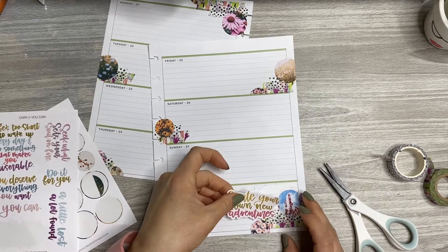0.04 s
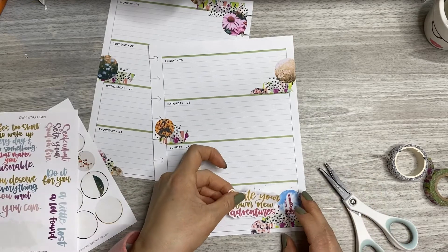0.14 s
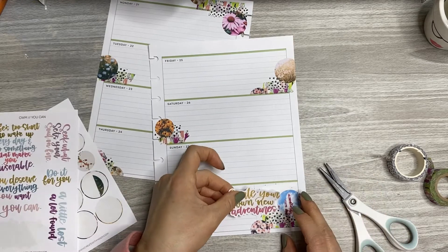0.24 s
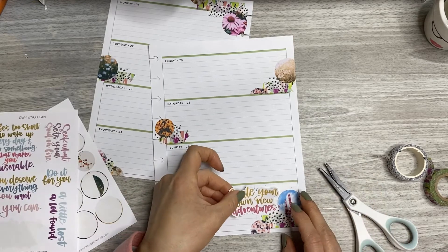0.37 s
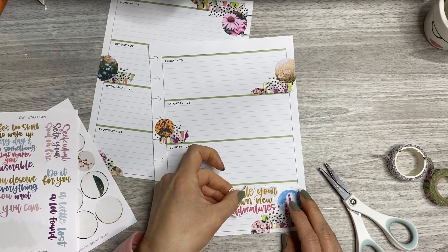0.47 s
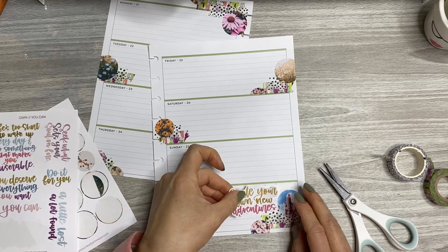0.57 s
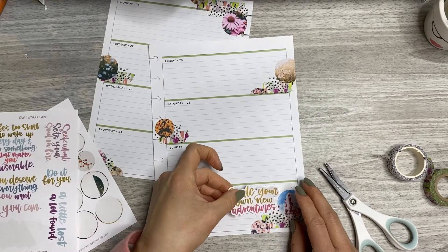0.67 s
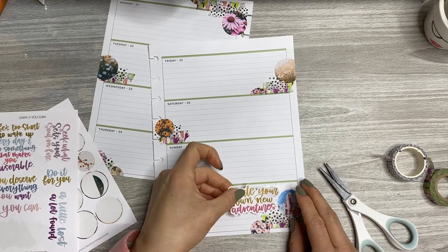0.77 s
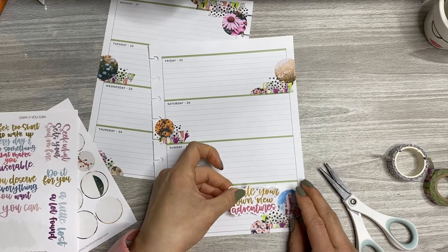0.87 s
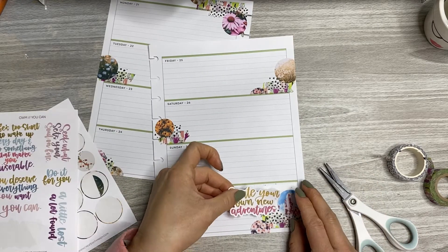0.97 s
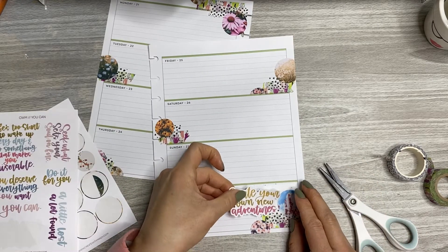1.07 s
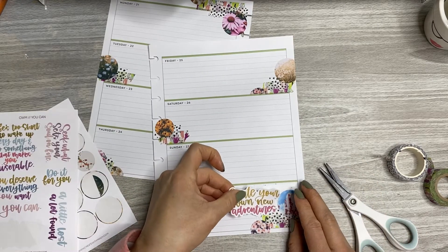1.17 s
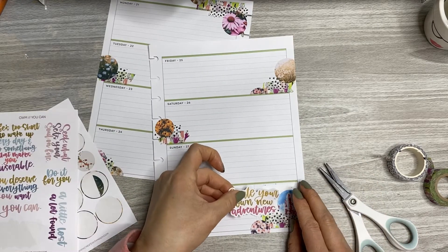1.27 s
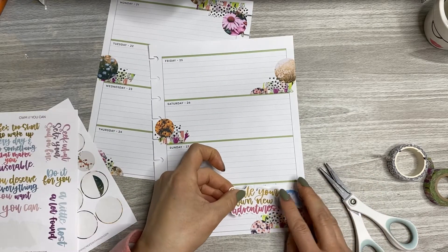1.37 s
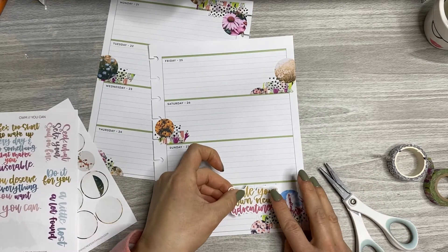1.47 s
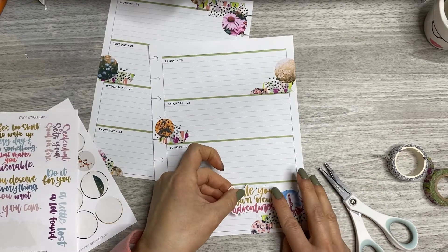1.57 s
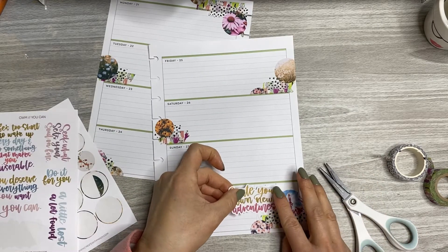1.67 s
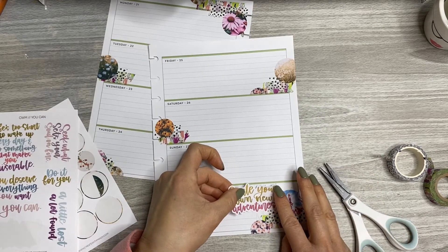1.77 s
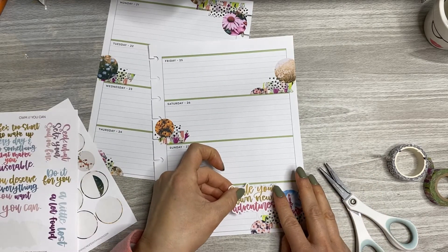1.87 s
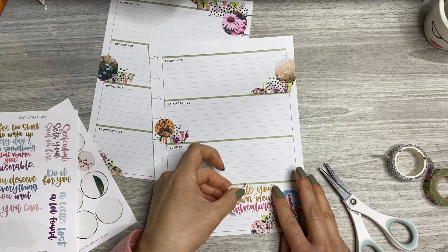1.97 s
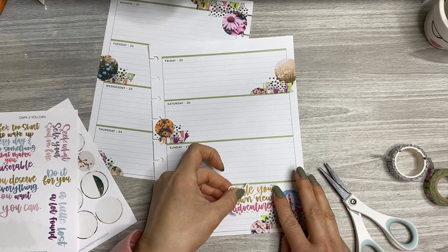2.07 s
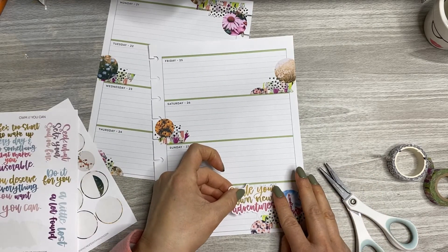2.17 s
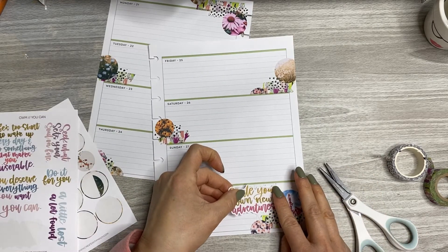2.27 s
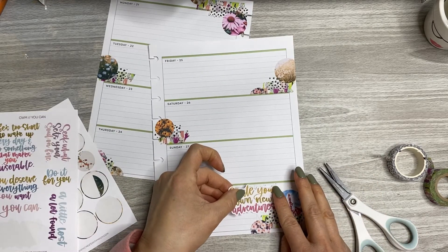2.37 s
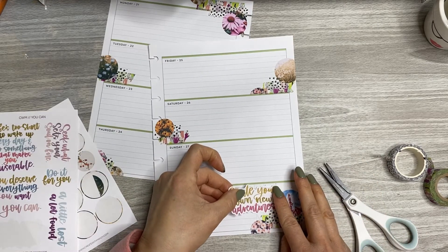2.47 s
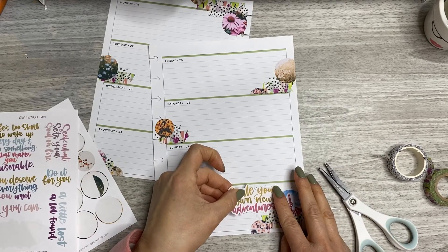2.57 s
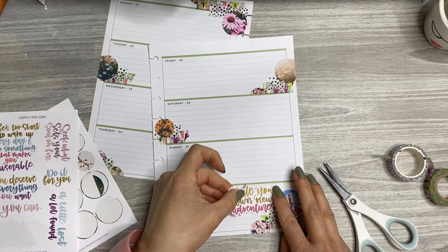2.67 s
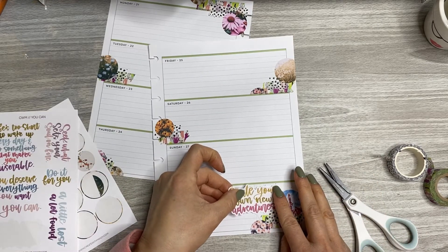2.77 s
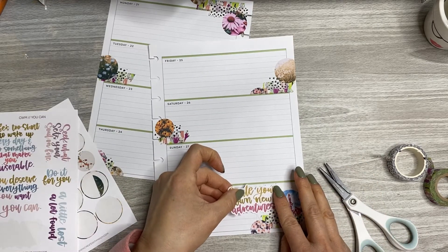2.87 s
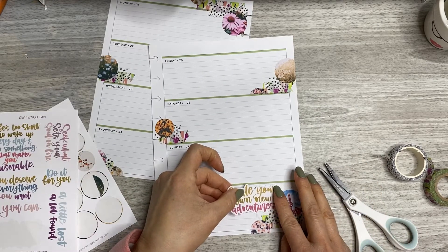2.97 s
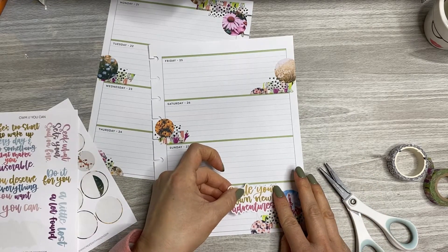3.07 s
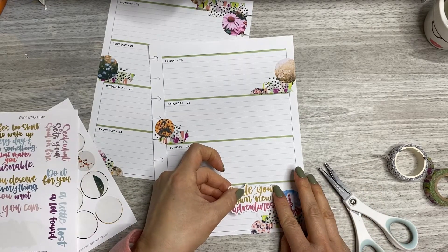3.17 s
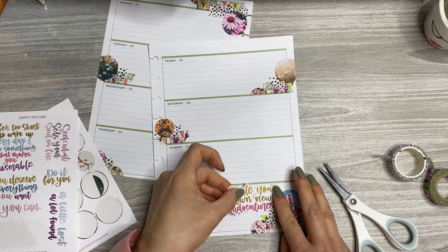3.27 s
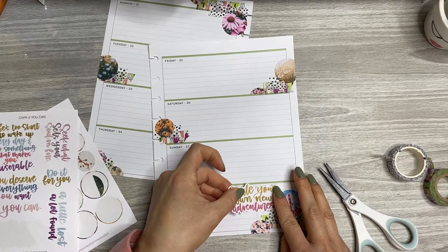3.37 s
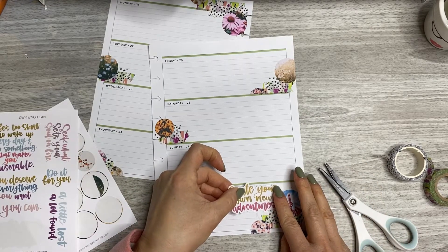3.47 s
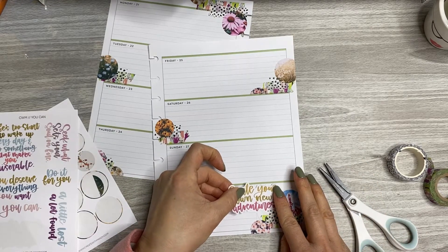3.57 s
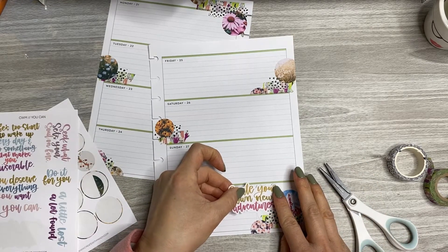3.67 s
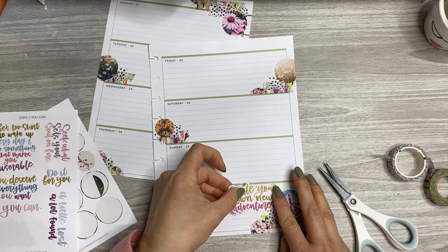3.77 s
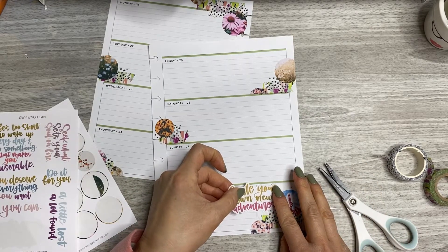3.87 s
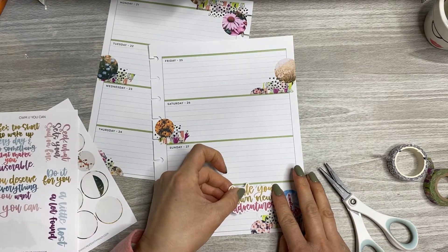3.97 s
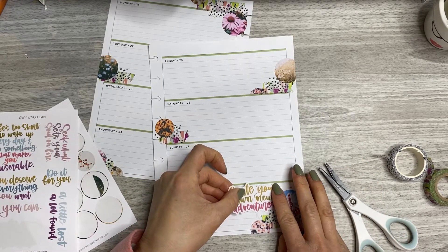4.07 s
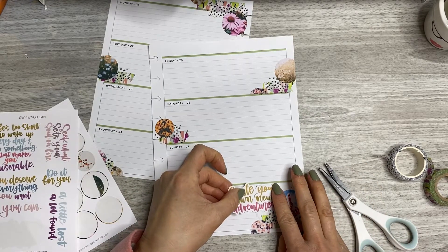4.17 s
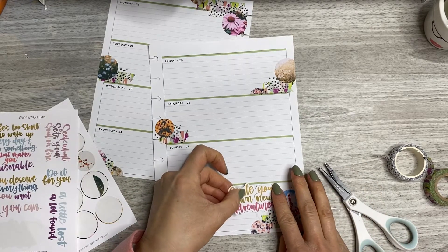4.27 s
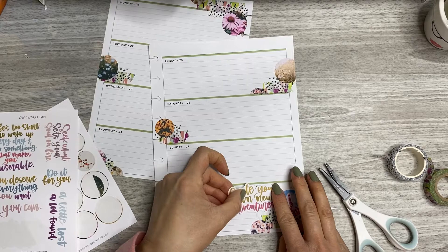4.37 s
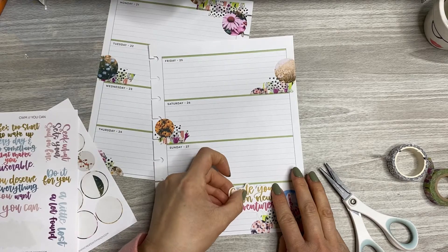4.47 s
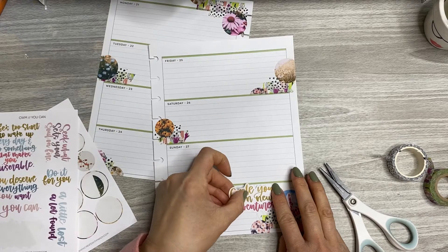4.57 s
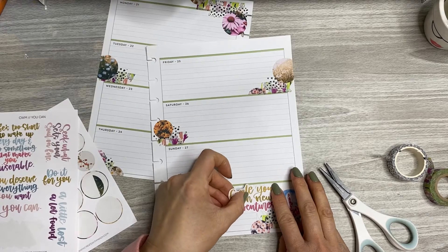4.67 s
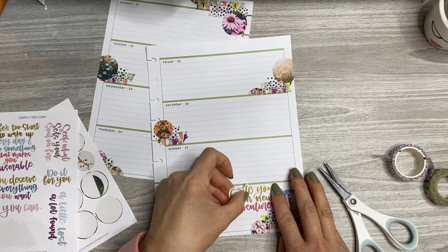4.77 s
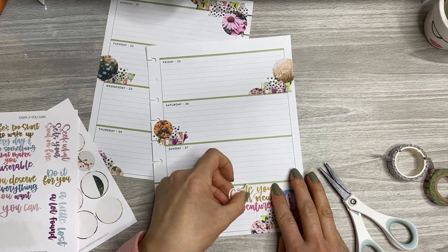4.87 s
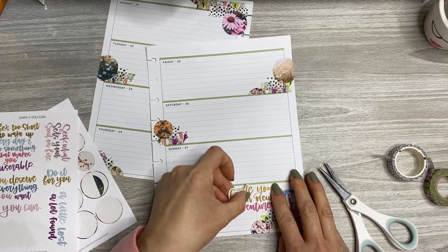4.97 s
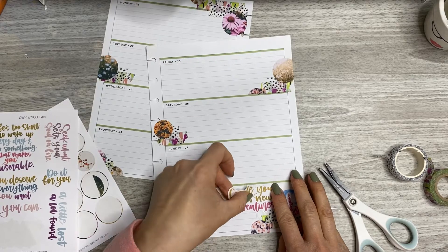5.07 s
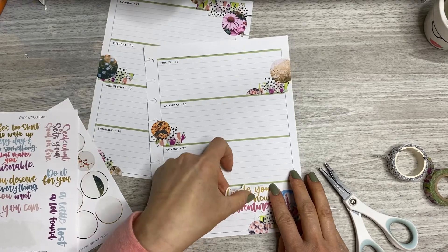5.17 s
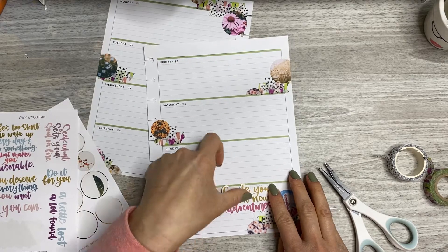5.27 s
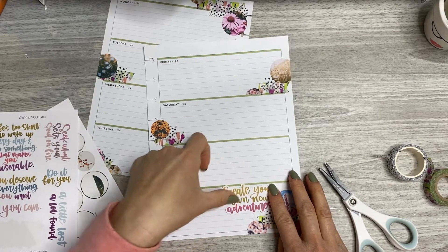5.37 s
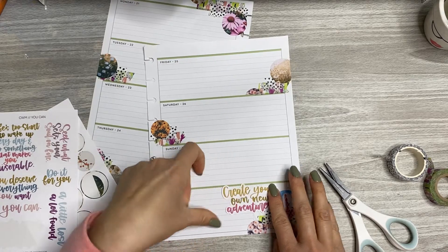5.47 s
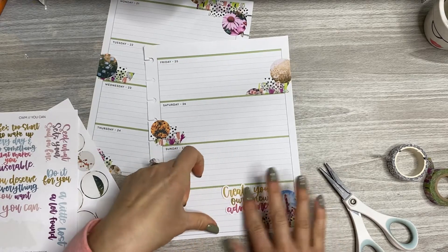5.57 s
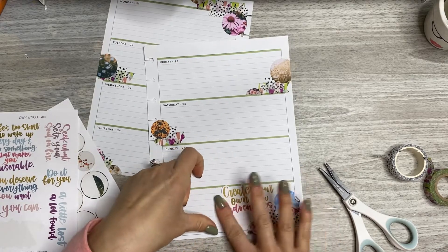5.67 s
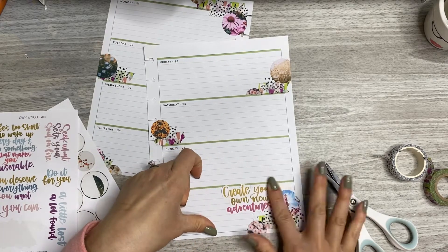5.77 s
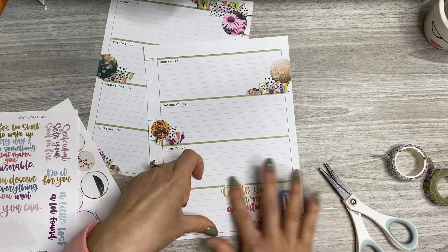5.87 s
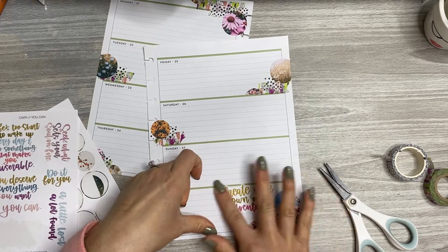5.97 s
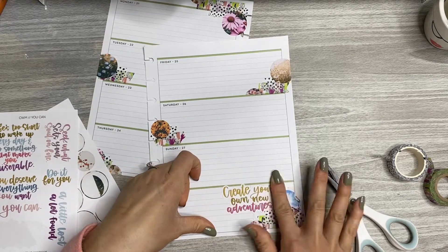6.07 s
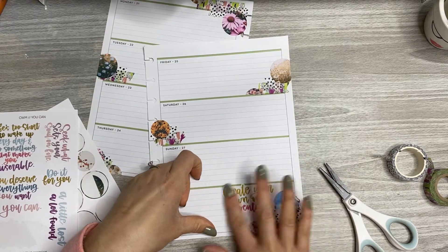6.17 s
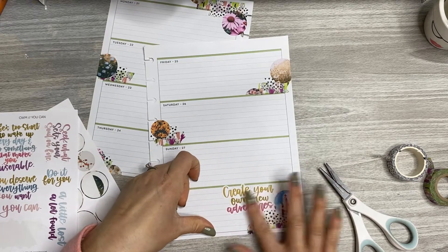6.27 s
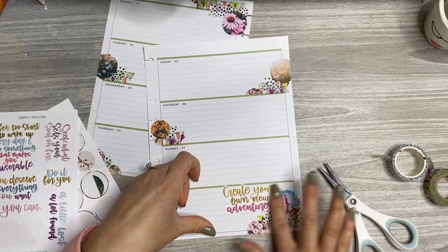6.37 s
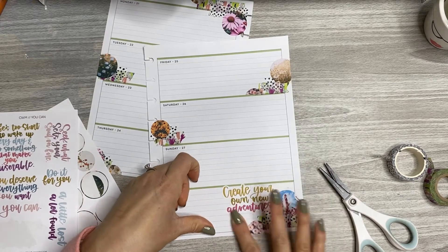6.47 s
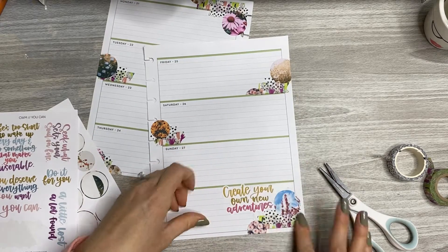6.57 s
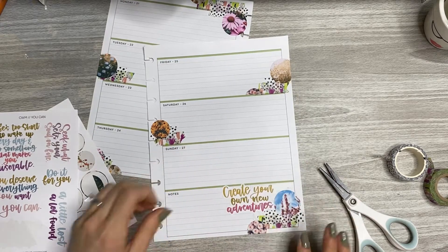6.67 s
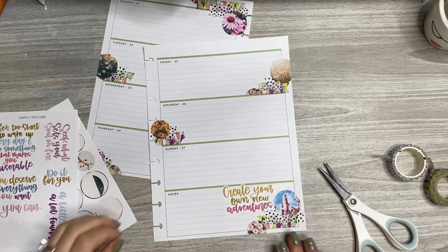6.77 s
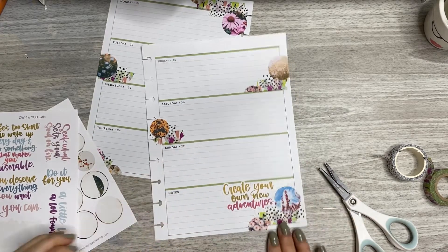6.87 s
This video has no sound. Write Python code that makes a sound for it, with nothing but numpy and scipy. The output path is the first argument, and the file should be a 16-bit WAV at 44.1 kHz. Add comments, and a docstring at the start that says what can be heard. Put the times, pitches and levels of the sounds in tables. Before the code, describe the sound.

A small room hums low, pulsing about three times a second. Fingertips barely slide and tick on a glossy paper sticker for several seconds. After a clear click and a thin drag, the sticker snaps free with a loud, bright crackle. Eight quick rubs then hiss to and fro, with two solid finger bumps on the table, and a palm sweeps away. Close stereo microphones.

```python
"""Hands lay a paper sticker on a planner page on a table: fingertips shift and tick on the sheet, the sticker
snaps free of the thumb, then eight quick strokes smooth it down and the hands sweep off the page.
Shaped noise makes the rubbing, spread-out clicks the ticks, fading tones the ringing sticker and table.
Fingers bump the table four times, twice hard. Two motors beat against each other in a small room's low hum."""
import sys
import numpy as np
from scipy import signal
from scipy.fft import rfft, irfft, next_fast_len
from scipy.io import wavfile
from scipy.ndimage import uniform_filter1d, map_coordinates

SR = 44100
rng = np.random.default_rng(int(sys.argv[2]) if len(sys.argv) > 2 else 0)


def generate_wav(signal):
    """Clip the signal to [-1, 1] and save it as 16-bit WAV at the path in sys.argv[1]."""
    frames = np.transpose(np.atleast_2d(signal))
    scaled = np.clip(frames, -1, 1) * 32767
    pcm = np.round(scaled).astype(np.int16)
    wavfile.write(sys.argv[1], SR, pcm)


N = 305833

# Strokes that smooth the sticker down. Each row: start in seconds, end in seconds,
# skin hiss in dB and page rustle in dB, both before the trims in smoothing().
STROKES = [(5.518, 5.626, -53.5, -74), (5.685, 5.768, -50, -64), (5.816, 5.9, -48.8, -62),
           (5.96, 6.048, -50, -63.5), (6.11, 6.18, -46.5, -62.5), (6.226, 6.316, -49.5, -63),
           (6.364, 6.436, -51, -64), (6.474, 6.556, -52, -64)]
# Short slides of a fingertip over the page. Each row: start in seconds, end in seconds, level in dB,
# tilt in dB per octave, level of the catches in dB relative to the slide.
SLIDES = [(.29, .39, -85, 0, 2), (.51, .72, -76.5, -1, -8), (.612, .672, -69, -2, 1),
          (1.34, 1.46, -77.5, -3, -8), (1.67, 1.9, -82.5, 0, 4), (1.725, 1.785, -71.5, 1, 7),
          (2.18, 2.25, -78, 0, 2), (2.85, 2.9, -77, 1, -2), (3.325, 3.355, -82, 0, 3),
          (3.9, 3.965, -80.5, -3, -5), (4.362, 4.42, -73, -2, -5), (5.44, 5.52, -66, 2, -3)]
# The sticker snapping off the thumb: time in seconds, level in dB, swell time in seconds,
# time for the crackle to fall 60 dB in seconds.
SNAP = (5.209, -22.7, .0013, .01)
# Colour of the rustling page. Each row: frequency in Hz, relative level in dB per Hz.
PAGE = [(120, -4), (300, 4), (650, .5), (1000, 1), (1350, -1.5), (1900, 1), (2800, -6), (4500, -18),
        (9000, -40)]
TOP_HZ = 15850  # band limit


def amp(db):
    """Decibels to gain."""
    return 10 ** (np.asarray(db) / 20)


def unit(x):
    """x scaled to an rms of 1."""
    return x / np.sqrt(np.mean(x ** 2) + 1e-20)


def along(points, hz):
    """Read a curve of (Hz, value) points on a logarithmic frequency axis."""
    f, v = np.transpose(points)
    return np.interp(np.log(hz + 1), np.log(f + 1), v)


def level(t, rows, column):
    """Gain at the times t along a curve given in dB."""
    rows = np.asarray(rows)
    return amp(np.interp(t, rows[:, 0], rows[:, column]))


def clock():
    """The time of every sample in seconds."""
    return np.arange(N) / SR


def filtered(x, response):
    """Multiply the spectrum of x by a response that depends on frequency."""
    n = x.shape[-1]
    m = next_fast_len(n + SR // 8)  # spare room so that the end does not wrap round
    return irfft(rfft(x, m) * response(np.fft.rfftfreq(m, 1 / SR)), m)[..., :n]


def coloured(x, spectrum):
    """x shaped by a curve of (Hz, dB), at an rms of 1."""
    return unit(filtered(x, lambda hz: amp(along(spectrum, hz))))


def add(track, s, sound):
    """Mix a sound into the track from time s."""
    part = track[max(round(s * SR), 0):][:len(sound)]
    part += sound[:len(part)]


def fading_modes(t, modes, after):
    """A struck object rings at its own pitches, each dying at its own pace from time zero of after."""
    return sum(amp(db - 60 * after / t60) * np.sin(2 * np.pi * (hz * t + rng.random()))
               for hz, db, t60 in modes)


def fibres(size, spiky_db):
    """Friction: countless tiny slips over paper fibres, a few much larger than the rest."""
    catch = np.repeat(rng.standard_normal(size // 16 + 1), 16)[:size]
    return rng.standard_normal(size) * amp(spiky_db * catch)


def halting(size, depth_db=1.5, rate=110):
    """The uneven grip of skin on paper: a random gain drawn rate times a second and smoothly joined."""
    draws = rng.standard_normal(int(size * rate / SR) + 4)
    return amp(depth_db * map_coordinates(draws, [np.arange(size) * rate / SR]))


def contact(t, start, end, rise, fall):
    """Speed of a finger that sets off around start and comes to rest around end."""
    setting_off = 1 + np.tanh((t - start) / rise)
    stopping = 1 + np.tanh((end - t) / fall)
    return setting_off * stopping / 4


def patchy(x, depth_db):
    """The colour of a rub drifts as the fingers cross different parts of the page."""
    z = signal.stft(x, nperseg=512)[2]
    field = uniform_filter1d(rng.standard_normal(z.shape), size=5, axis=0)  # smooth over frequency
    field = uniform_filter1d(field, size=8, axis=1)  # smooth over time
    return unit(signal.istft(z * amp(depth_db * unit(field)), nperseg=512)[1][:len(x)])


def resonant(x):
    """x with the resonances of the room and desk standing out of it, at an rms of 1."""
    # Each row: centre in Hz, width in Hz, boost in dB.
    resonances = [(293, 25, 4), (445, 35, 4), (587, 30, 4), (860, 45, 3), (1253, 70, 3), (1850, 120, 2)]

    def boost(hz):
        return amp(sum(db / (1 + (2 * (hz - centre) / width) ** 2) for centre, width, db in resonances))
    return unit(filtered(x, boost))


def spread(pair):
    """Two unrelated signals become a diffuse field at the left and right microphones."""
    # How alike left and right are. Each row: frequency in Hz, likeness from 0 to 1.
    likeness = [(120, .99), (300, .9), (550, .2), (1100, .15), (1700, .8), (2700, .3), (5000, .55),
                (7500, .85), (13000, .7)]

    def mid_and_side(hz):
        turn = np.arccos(np.clip(along(likeness, hz), -1, 1)) / 2
        return np.array([np.cos(turn), np.sin(turn)])
    mid, side = filtered(pair, mid_and_side)
    return np.array([mid + side, mid - side])


def room_tone(rumble_db=-51.6, air_db=-64, in_step=.12):
    """Two motors just out of tune throb three times a second over mains hum, steady rumble and air."""
    # Motors and mains. Each row: frequency in Hz, level in dB rms.
    hum_tones = [(53.75, -51.7), (56.98, -50), (120, -62)]
    # Colour of the room's rumble. Each row: frequency in Hz, relative level in dB per Hz.
    rumble_colour = [(20, -27), (35, -20), (46, -9), (57, -1.5), (68, -6), (88, -10), (105, -2), (121, -5),
                     (131, 3), (146, -9), (180, -11), (240, -24), (400, -46), (700, -90)]
    # Colour of the room's air noise. Each row: frequency in Hz, relative level in dB per Hz.
    air_colour = [(100, -14), (250, -1.5), (350, -2.5), (450, -3.5), (640, -6.5), (820, -16.5), (1100, -24),
                  (1400, -22), (1800, -24.5), (2200, -33), (4000, -37), (8000, -41), (13000, -44.5),
                  (15000, -54)]
    t = clock() - in_step  # the motors swing together at in_step seconds
    hum = sum(amp(db) * unit(np.cos(2 * np.pi * hz * t)) for hz, db in hum_tones)
    rumble = amp(rumble_db) * coloured(rng.standard_normal((2, N)), rumble_colour)
    air = amp(air_db) * resonant(coloured(rng.standard_normal((2, N)), air_colour))
    return hum + spread(rumble + air)


def tick(body_db, edge_db, gain_db=26.3, travel=.0009, flutter_db=-2, flutter_t60=.012):
    """A crack that bending waves smear over a millisecond or more, then a short flutter of the paper."""
    t = np.arange(SR // 16) / SR
    colour = [(900, body_db - 16), (2200, body_db + 1), (3500, body_db / 2 - 2), (5300, 3),
              (7500, edge_db / 2 - 3), (11000, edge_db - 3), (16000, edge_db - 9)]  # (Hz, dB)
    flutter = rng.standard_normal(len(t)) * amp(-60 * t / flutter_t60)
    burst = (t == 0) + amp(flutter_db) * flutter / np.linalg.norm(flutter)

    def through_sheet(hz):
        lag = 2 * np.pi * travel * 2 * np.sqrt(hz * TOP_HZ)  # high notes run faster through the sheet
        return amp(along(colour, hz)) * np.exp(-1j * lag)
    return amp(gain_db) * filtered(burst, through_sheet)


def catches(scatter_db=3.5, per_s=45, scratch_db=-9, strays_per_s=3, stray_db=-83):
    """Chance ticks: fingers catch often in a slide or stroke; the held sticker's glue ticks now and then."""
    t = clock()
    chance = rng.random(N)
    size = amp(scatter_db * np.clip(rng.standard_normal(N), -2, 1))
    sliding = sum(amp(db + catch_db) * (t > start) * (t < end) for start, end, db, _, catch_db in SLIDES)
    # nails catch on the page during a stroke, scratch_db relative to the stroke's hiss
    rubbing = sum(amp(db + scratch_db) * (t > start) * (t < end) for start, end, db, _ in STROKES)
    held = amp(stray_db) * (t < SNAP[0])
    caught = (sliding + rubbing) * (chance < per_s / SR)
    stray = held * (chance < strays_per_s / SR)
    return signal.fftconvolve(size * (caught + stray), tick(body_db=-17, edge_db=-1))[:N]


def glide(size, tilt_db, spiky_db=4):
    """Light, halting friction of skin on the glossy sticker, duller or brighter by its tilt."""
    # Colour of the friction. Each row: frequency in Hz, relative level in dB per Hz before the tilt.
    glossy = [(500, -15), (1500, -16), (3000, -16), (4000, -10.5), (4700, -8), (5300, 2.5), (6100, -.5),
              (7200, -2), (9000, -6), (12500, -7), (15800, -16)]
    colour = [(hz, db + tilt_db * np.log2(max(hz, 3000))) for hz, db in glossy]  # tilts above 3 kHz
    return coloured(fibres(size, spiky_db), colour) * halting(size)


def slides(ease=.22, longest_ease=.03):
    """Short slides while the sticker is lined up; longer ones ease in and out more slowly."""
    out = np.zeros(N)
    margin = .12  # seconds of lead-in
    for start, end, db, tilt_db, _ in SLIDES:
        t = start - margin + np.arange(SR // 2) / SR
        edge = min(ease * (end - start) + .004, longest_ease)
        add(out, t[0], amp(db) * glide(len(t), tilt_db) * contact(t, start, end, edge, edge))
    return out


def ticks(lead=.0009):
    """The sharpest ticks of nail, glue and paper edge, each with its own colour."""
    # Each row: time in seconds, level in dB before the gain in tick(), body in dB, edge in dB.
    sharp_ticks = [(0.6342, -56, -10, -3), (0.6582, -64, -10, 7), (1.7494, -65, -20, -1),
                   (1.7653, -62, -24, -3), (2.8471, -65, -14, 1), (4.5769, -60, -22, -7),
                   (4.588, -37.5, -12, -7), (4.692, -61, -8, 0), (4.7614, -72, -20, -1),
                   (4.9532, -71, -13, 8), (5.1148, -55, -17, 4), (5.45, -58, -16, 1),
                   (5.4694, -52, -16, 12), (5.8112, -58, -3, 0)]
    out = np.zeros(N)
    for s, db, body_db, edge_db in sharp_ticks:
        add(out, s - lead, amp(db) * tick(body_db, edge_db))
    return out


def bumps(fall=.0125, arrival=.0095, width=.0048, slap_t60=.026, rustle_db=-15, rustle_t60=.13):
    """A finger slaps the paper, which rustles on; a bending wave, high notes first, makes the table ring."""
    # Fingers on the table. Each row: time in seconds, thud level in dB, first pitch in Hz,
    # slap level in dB before a 4 dB lift, slap rise in seconds, slap tilt in dB per octave.
    hits = [(2.3342, -50, 340, -55.5, .0005, 1.2), (5.8655, -33.5, 280, -36, .004, -.9),
            (5.932, -54, 280, -51, .003, -2.5), (6.385, -32, 270, -42, .003, -4.3)]
    # Colour of the slap. Each row: frequency in Hz, relative level in dB per Hz before the tilt.
    slap_colour = [(100, -1), (250, 3), (450, 4), (1000, 1), (2000, -4), (4500, -7), (7000, -12),
                   (15000, -18)]
    # Ringing of the table top. Each row: pitch in Hz, level in dB relative to the thud,
    # time to fall 60 dB in seconds.
    table_modes = [(178, -17, .14), (325, -12, .1), (368, -12, .11), (490, -18, .08)]
    out, t = np.zeros(N), np.arange(SR // 6) / SR
    for s, thud_db, first_hz, slap_db, rise, tilt_db in hits:
        pitch = first_hz / (1 + (t / fall) ** 3)
        swell = np.exp(-((t - arrival) / width) ** 2 / 2)
        thud = swell * np.sin(2 * np.pi * np.cumsum(pitch) / SR)
        ring = fading_modes(t, table_modes, after=t) * (1 - np.exp(-t / arrival))
        fade = amp(-60 * t / slap_t60) + amp(rustle_db - 60 * t / rustle_t60)
        colour = [(hz, db + tilt_db * np.log2(hz)) for hz, db in slap_colour]
        slap = coloured(rng.standard_normal(len(t)), colour) * (1 - np.exp(-t / rise)) * fade
        add(out, s, amp(thud_db) * (thud + ring) + amp(slap_db + 4) * slap)
    return out


def peeling(drag_db=1, settle_db=-21, settle_t60=.7):
    """The sticker slips once and settles; then the thumb drags off it, before and after the snap."""
    # The sticker shifting under the thumb: time of the fastest slip in seconds, level in dB,
    # swell time in seconds, time to fall 60 dB in seconds.
    s, db, swell, t60 = (4.606, -53, .012, .11)
    # The dragging thumb, one list before the snap and one after. Each row: time in seconds,
    # level in dB before drag_db is added.
    drag_curves = [
        [(4.9, -93), (4.948, -79), (5.1, -69), (5.11, -57), (5.195, -64)],
        [(5.245, -59), (5.281, -67), (5.389, -68), (5.413, -82), (5.43, -79)],
    ]
    out, t = np.zeros(N), np.arange(-SR // 8, SR) / SR
    after, rows = np.maximum(t, 0), np.concatenate(drag_curves)
    fade = amp(-60 * after / t60) + amp(settle_db - 60 * after / settle_t60)
    slip = amp(db) * np.exp(np.minimum(t, 0) / swell) * fade
    dragging = (s + t > rows[0, 0]) * (s + t < rows[-1, 0])
    drag = amp(drag_db) * level(s + t, rows, column=1) * dragging
    add(out, s + t[0], slip * glide(len(t), tilt_db=-2.5) + drag * glide(len(t), tilt_db=1.3))
    return out


def snap(ring_db=-8, flutter_db=-23, flutter_t60=.1):
    """The glue lets go in a swelling crackle; the stiff sticker rings briefly and flutters onto the page."""
    # Ringing of the stiff sticker. Each row: pitch in Hz, level in dB before ring_db is added,
    # time to fall 60 dB in seconds.
    sheet_modes = [(2005, -12, .02), (2278, -11, .02), (4205, -16, .03), (5140, -4, .016), (5885, -5, .022),
                   (6720, -9, .016), (8230, -12, .02), (9650, -11, .02), (11600, -12, .02)]
    # Colour of the crackle. Each row: frequency in Hz, relative level in dB per Hz.
    crackle_colour = [(500, -25), (1000, -19), (1700, -18), (2100, -4), (2600, -8), (3100, -11),
                      (4300, -7.5), (5150, 3.5), (6200, 0), (7300, -3), (9000, -5), (12500, -4),
                      (15800, -12)]
    s, db, swell, crackle_t60 = SNAP
    out, t = np.zeros(N), np.arange(-SR // 50, SR // 5) / SR
    rise, after = np.exp(np.minimum(t, 0) / swell), np.maximum(t, 0)
    fade = amp(-60 * after / crackle_t60) + amp(flutter_db - 60 * after / flutter_t60)
    crackle = coloured(rng.standard_normal(len(t)), crackle_colour) * fade
    ring = fading_modes(t, sheet_modes, after)
    add(out, s + t[0], amp(db) * rise * (crackle + amp(ring_db) * ring))
    return out


def smoothing(page_rise=.026, page_fall=.044, skin_db=0, rustle_db=.7):
    """Fingers rub to and fro: skin hisses and hushes at each turn; the page rustles on a little longer."""
    # Colour of the skin's hiss. Each row: frequency in Hz, relative level in dB per Hz.
    skin_colour = [(1000, -26), (2600, -18), (3700, -15), (4400, -9.5), (5100, -2.5), (5800, 3.5),
                   (6900, -2), (8500, -4), (10500, -1.5), (13000, .5), (15800, -3.5)]
    out, t = np.zeros(N), np.arange(5 * SR, N) / SR
    speed = np.array([contact(t, start, end, rise=.012, fall=.02) for start, end, _, _ in STROKES])
    drag = np.array([contact(t, start, end, page_rise, page_fall) for start, end, _, _ in STROKES])
    _, _, hiss_db, page_db = np.transpose(STROKES)
    size = len(t)
    hiss = amp(hiss_db + skin_db) @ speed
    hiss = hiss * patchy(coloured(fibres(size, spiky_db=2.2), skin_colour), depth_db=1.1)
    hiss = hiss * halting(size, depth_db=.7, rate=160)
    page = amp(page_db + rustle_db) @ drag
    page = page * patchy(resonant(coloured(fibres(size, spiky_db=3), PAGE)), depth_db=2.6)
    page = page * halting(size, depth_db=2.2, rate=120)
    add(out, t[0], (hiss + page) * halting(size, depth_db=1.3, rate=35))
    return out


def leaving(palm_db=.5, page_db=-1):
    """The hands lift, the page rustles faintly, and a palm sweeps away over it."""
    # Hands sweeping off the page. Each row: time in seconds, skin level in dB before palm_db is added,
    # page level in dB before page_db is added.
    sweep = [(6.58, -75, -79), (6.614, -83, -80), (6.79, -80, -76), (6.82, -68, -80), (6.846, -56, -74),
             (6.925, -50, -68)]
    # Colour of the palm. Each row: frequency in Hz, relative level in dB per Hz.
    palm_colour = [(1000, -22), (2800, -17), (3800, -7), (4800, -3), (5700, 3), (7200, -3), (9000, -8),
                   (12500, -8), (15800, -15)]
    out, size = np.zeros(N), SR // 2
    t = sweep[0][0] + np.arange(size) / SR
    palm = amp(palm_db) * level(t, sweep, column=1) * coloured(fibres(size, spiky_db=4), palm_colour)
    rustle = patchy(coloured(fibres(size, spiky_db=5), PAGE), depth_db=2.6)
    page = amp(page_db) * level(t, sweep, column=2) * rustle
    add(out, t[0], (palm + page) * halting(size))
    return out


def walls(x):
    """The small room answers with a tail of fading noise; its treble dies first."""
    # Each row: frequency in Hz, time for the echo to fall 60 dB in seconds.
    decay = [(200, .3), (2000, .26), (6000, .24), (14000, .17)]
    hz, t, z = signal.stft(rng.standard_normal((2, SR // 3)), SR, nperseg=256)
    fade = amp(-60 * t / along(decay, hz)[:, None])
    tail = spread(signal.istft(z * fade, SR, nperseg=256)[1])
    late = np.pad(x, (SR // 300, 0))  # the answer starts a 300th of a second late
    return signal.fftconvolve(late[None], tail / np.linalg.norm(tail[0]), axes=1)[:, :N]


def scene(wet_db=-12.5):
    """Hands and paper close below the microphones, the room around them."""
    # Hard surfaces beside the microphones. Each row: delay in seconds, level in dB.
    echoes = [(.00135, -13), (.0031, -17), (.0068, -21)]
    paper = smoothing() + slides() + peeling() + leaving() + ticks() + catches() + snap() + bumps()

    def reflections(hz):
        return 1 + sum(amp(db) * np.exp(-2j * np.pi * hz * delay) for delay, db in echoes)
    near = filtered(paper, reflections)
    return near + amp(wet_db) * walls(paper) + room_tone()


def record(dry):
    """The two microphone ports differ in phase and level; a steep cut removes what lies above the band limit."""
    # Level difference. Each row: frequency in Hz, left minus right in dB.
    lean = [(60, 0.0), (110, -1.5), (200, -3.0), (380, -6.5), (700, -6.0), (1290, 0.0), (2380, -0.5),
            (4400, 0.0), (8120, 0.0), (15000, 0.0)]
    # Phase difference. Each row: frequency in Hz, lead of the left in radians.
    ports = [(0, 0), (200, -.2), (380, -.5), (700, 1.5), (1200, 0), (3000, .5), (5200, .2), (7200, 3.14),
             (9900, 6.2), (11000, 6.3), (13300, 9.4), (16000, 11.8)]

    def response(hz):
        half = np.array([[.5], [-.5]])  # each side takes half the difference
        lead = np.interp(hz, *np.transpose(ports))
        band = 1 / (1 + (hz / TOP_HZ) ** 200)
        return amp(half * along(lean, hz)) * np.exp(1j * half * lead) * band
    return filtered(dry, response)


dry = scene()
out = record(dry)
generate_wav(out)
```